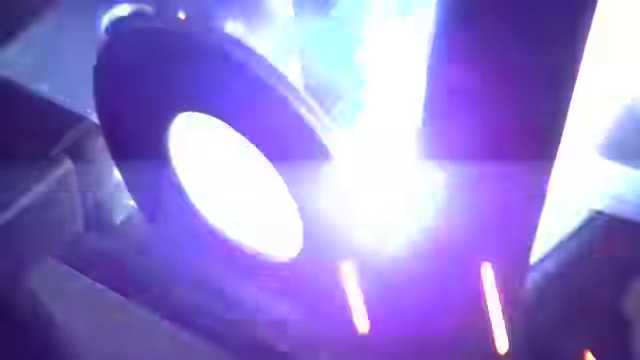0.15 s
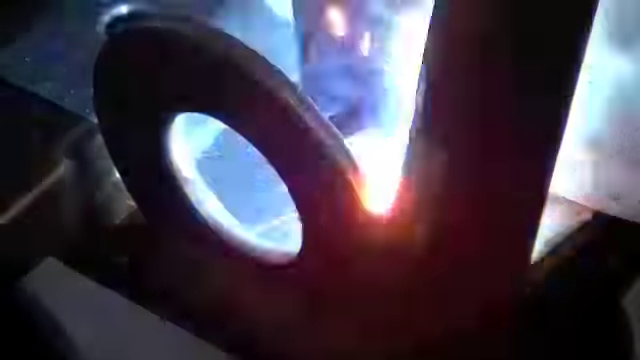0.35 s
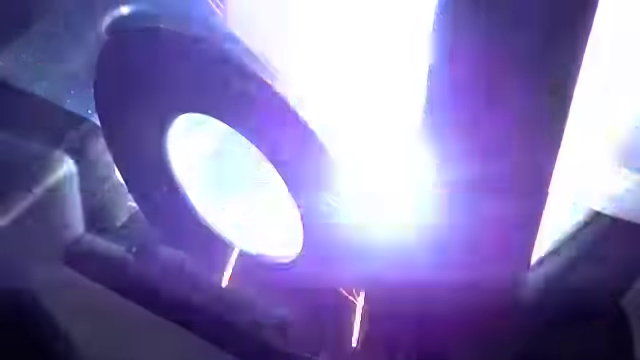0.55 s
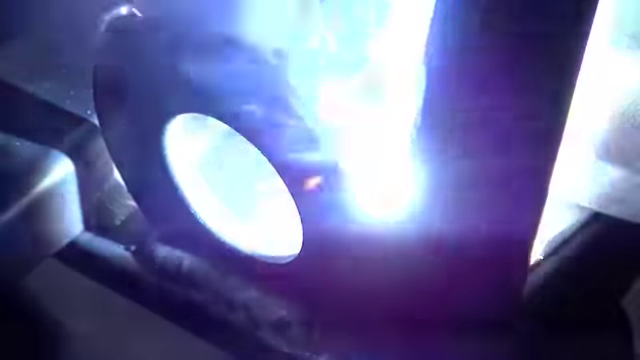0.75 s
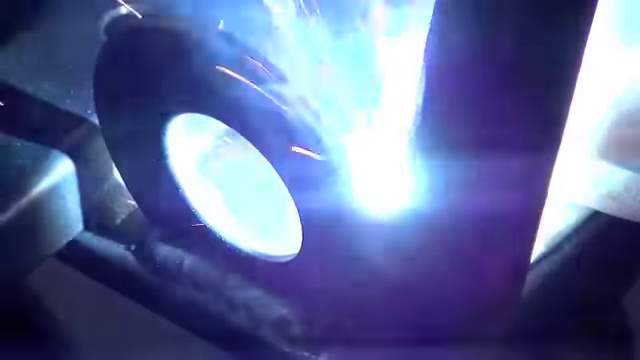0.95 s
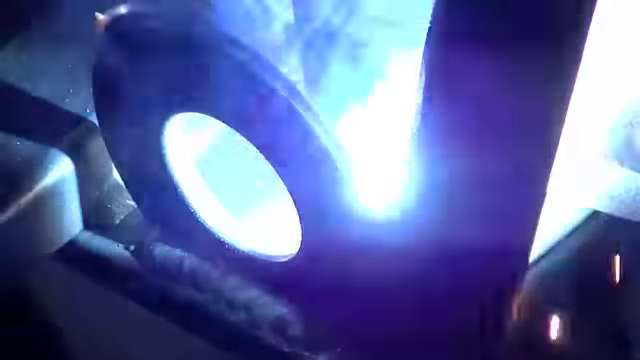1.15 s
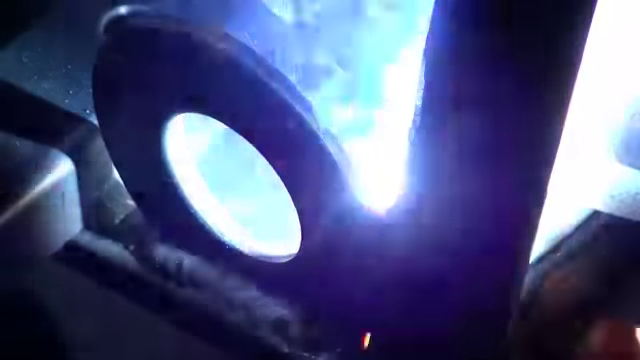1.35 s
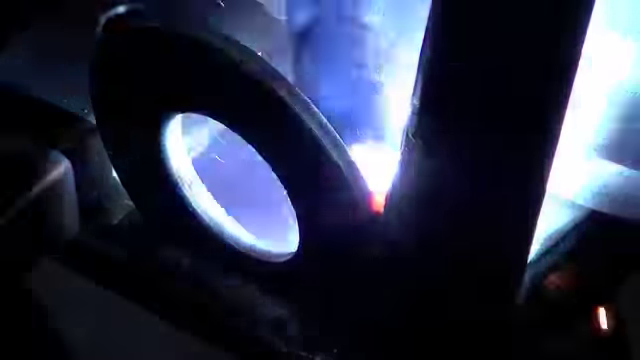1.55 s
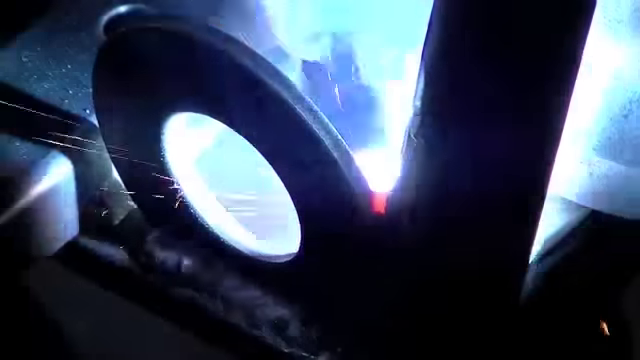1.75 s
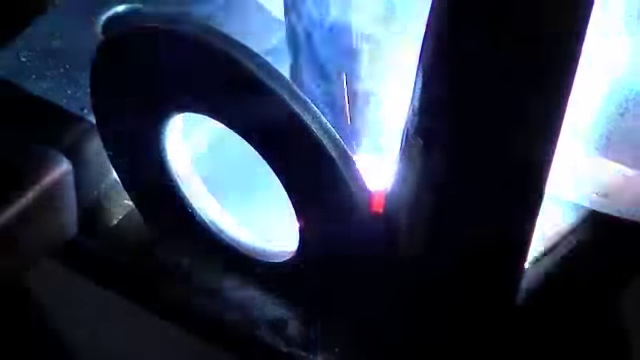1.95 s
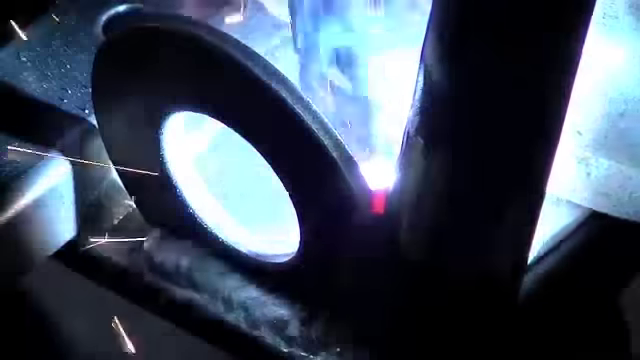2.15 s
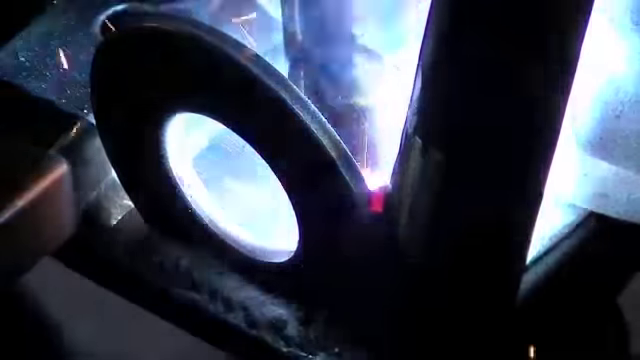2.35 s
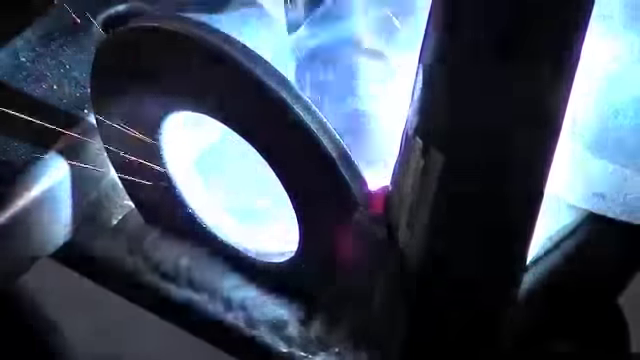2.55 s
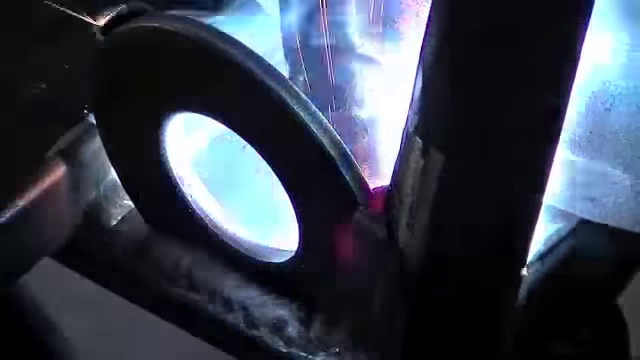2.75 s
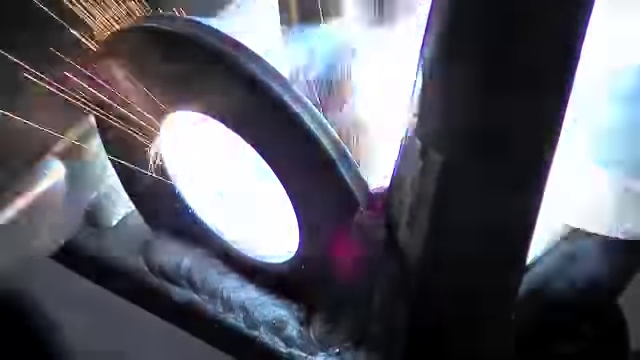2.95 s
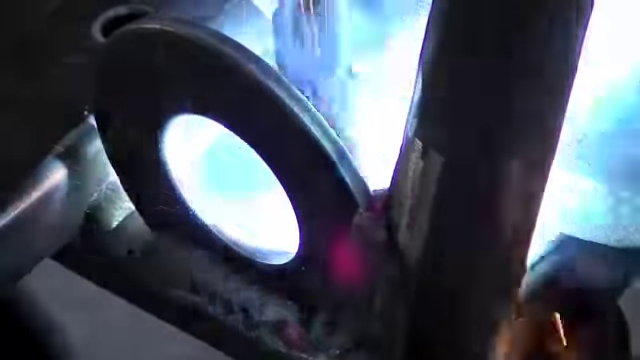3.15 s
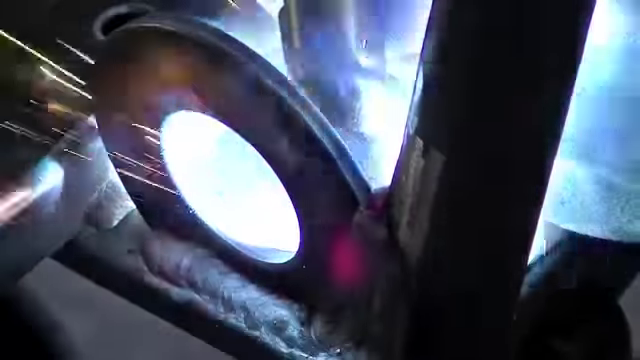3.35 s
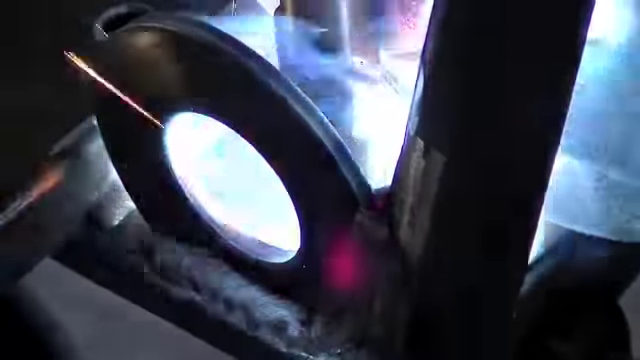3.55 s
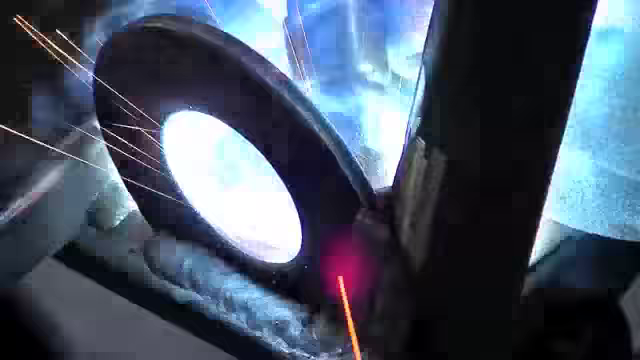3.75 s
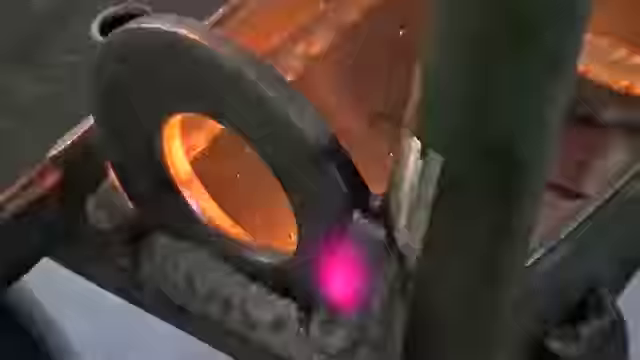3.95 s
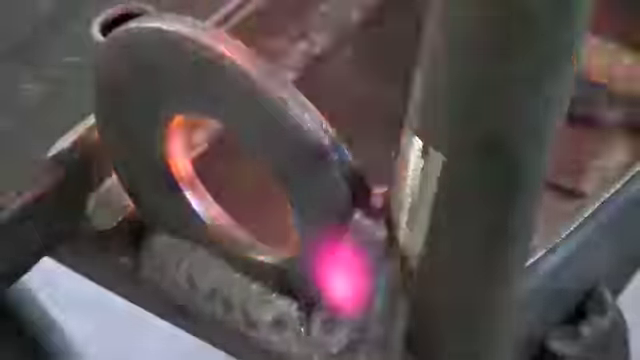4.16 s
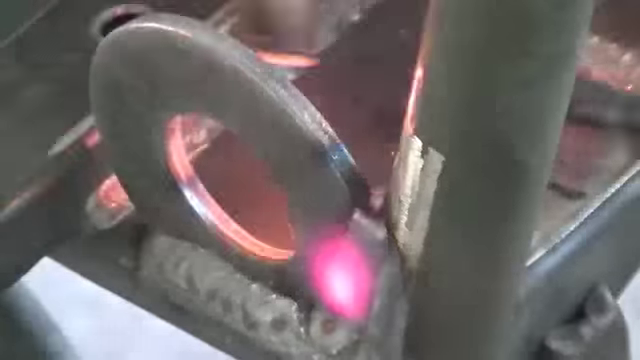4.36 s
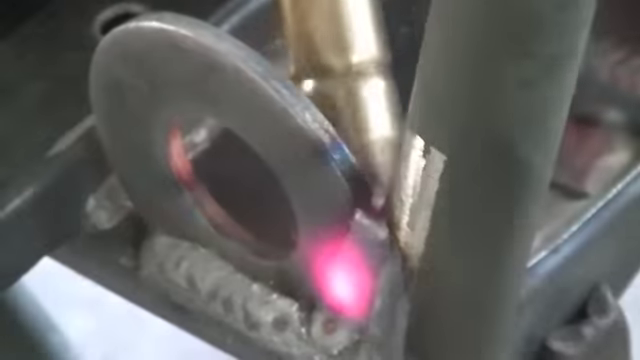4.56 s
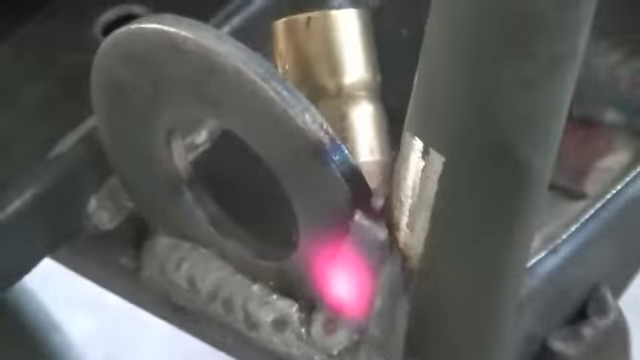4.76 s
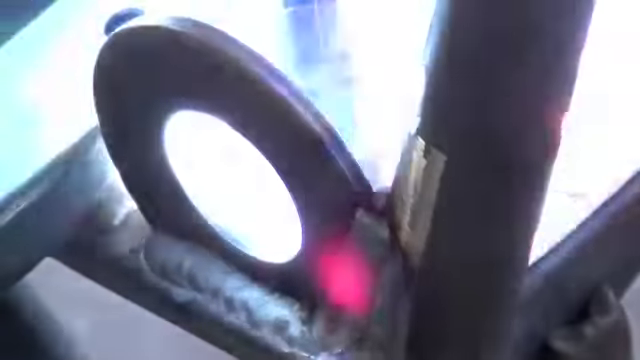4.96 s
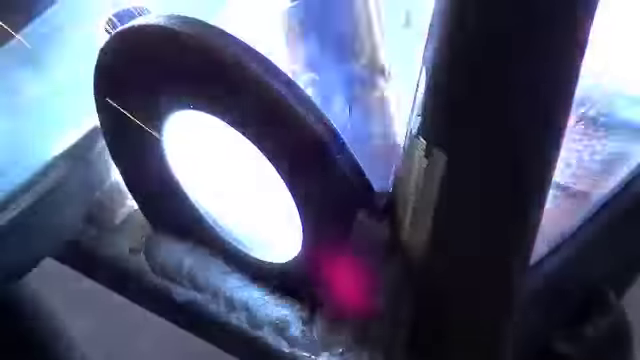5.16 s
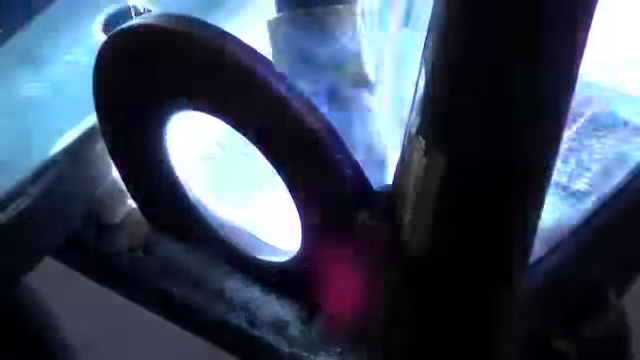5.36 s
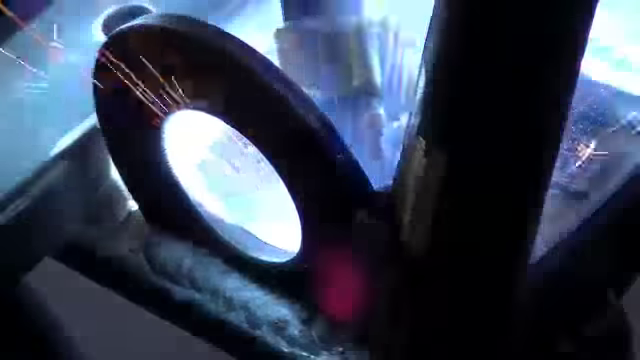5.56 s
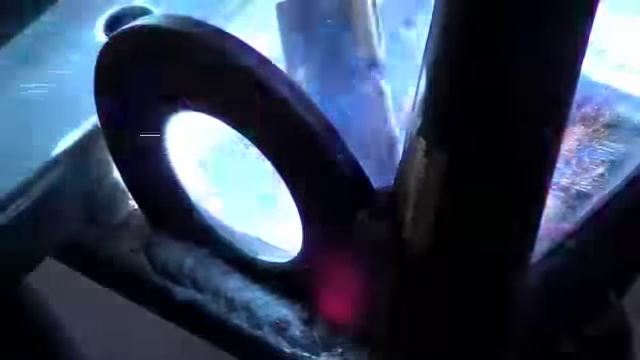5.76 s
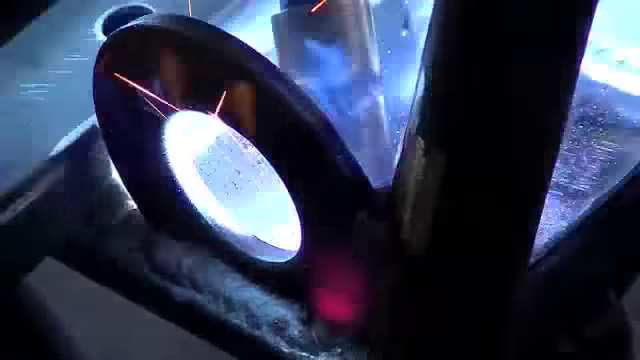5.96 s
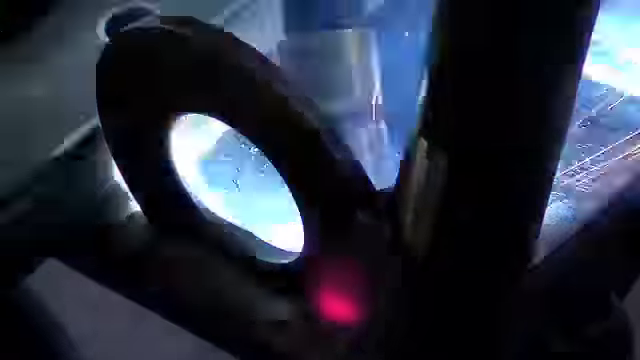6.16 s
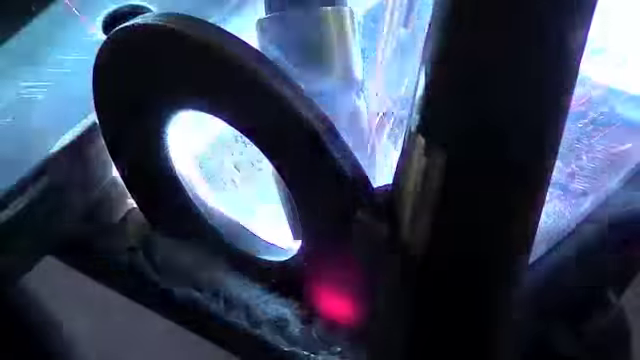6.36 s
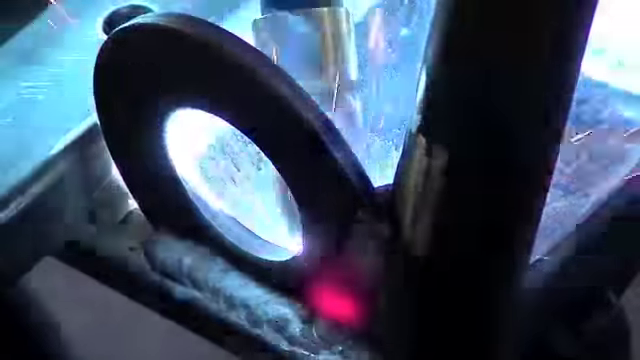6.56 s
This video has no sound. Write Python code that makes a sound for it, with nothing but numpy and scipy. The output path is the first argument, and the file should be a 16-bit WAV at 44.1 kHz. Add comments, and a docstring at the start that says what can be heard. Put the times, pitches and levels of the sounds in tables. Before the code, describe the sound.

A harsh, rapidly snapping welding arc fades out, returns as a softer sizzling hiss, stops to reveal workshop machinery and a tiny squeak, then reignites.

```python
"""Wire-feed welding in a workshop

An arc is heard from three torch positions in turn: short circuits snap, droplets crackle and the arc hisses.
These impulses and noises excite the resonances of the steel parts. The sound fades out and in once. Later,
while the arc is out, the filtered noise of the shop machinery comes up with puffs of air and a squeak.
A few steady motor tones whine beneath the later positions."""
import sys
import numpy as np
from scipy import signal
from scipy.fft import rfft, irfft
from scipy.io import wavfile
from scipy.ndimage import uniform_filter1d

SR = 44100
rng = np.random.default_rng(int(sys.argv[2]) if len(sys.argv) > 2 else 0)


def unload_audio(sound):
    """Save the sound as a 16-bit wav file, at the path given as the first command line argument."""
    columns = np.transpose(np.atleast_2d(sound))
    # keep every value between -1 and 1, then stretch to whole-number steps
    steps = np.round(np.clip(columns, -1, 1) * 32767)
    wavfile.write(sys.argv[1], SR, steps.astype(np.int16))


N = 291060

# Lone short circuits of the first position. Each row: time in seconds, level over the arc strength in dB,
# length in seconds of the stall before it.
SNAPS = [(0.1527, 23.5, 0.004), (0.218, 14, 0.061), (0.228, 23, 0.0098), (0.2348, 17, 0.021),
         (0.248, 22.5, 0.013), (0.2862, 24, 0.047), (0.361, 23, 0), (0.3762, 17, 0), (0.3847, 21, 0),
         (0.4224, 23.5, 0.023), (0.4505, 25, 0.026), (0.4878, 21, 0), (0.4926, 22, 0.0046),
         (0.5078, 22, 0.0068), (0.5229, 17, 0), (0.5562, 18, 0), (0.605, 7, 0), (0.6203, 16, 0),
         (0.6251, 22, 0.013), (0.7407, 23, 0), (0.7524, 8, 0.027), (0.7673, 23, 0.021), (1.051, 20, 0),
         (1.07, 22, 0.0027)]
# Later strikes of the arc, in the second and third positions. Each row: time in seconds, click level in dB,
# length in seconds of the stall before it.
RESTRIKES = [(2.9543, -7, 0), (2.9772, -8, .022), (3.0398, -4, .024), (3.0724, -5, .018), (3.0798, -7, 0),
             (3.0994, -8, .008), (3.1241, -4, .024), (3.1426, -8, .008), (3.1536, -4, .008),
             (3.1644, -6, .008), (3.1968, -5, 0), (3.2165, -5, 0), (3.7255, -6, 0), (3.7536, -4, .02),
             (3.7895, -7, .02), (3.8143, -4, .008), (3.8221, -7, .006), (3.836, -8, .012), (4.901, -12, 0),
             (4.9059, -4, 0), (4.9111, -6, 0), (4.9397, -6, 0), (6.0657, -4, .022), (6.0911, -8, 0),
             (6.1108, -6, .016), (6.1316, -5, .006), (6.1527, -4, .01), (6.1878, -4, .01),
             (6.2705, -5, .015), (6.2797, -7, 0), (6.3219, -5, 0)]
# Arc strength, one list per position. Each row: time in seconds, level in dB, gain above 12 kHz in dB.
ARC = [
    [(0, -15.5, -5), (.12, -18, -5), (.5, -19, -7), (.65, -18.5, 1), (1.272, -19.5, 5.5)],
    [(1.272, -30, -1), (1.8, -29.5, -3), (2.2, -32, 0.5), (2.6, -29.5, 0), (2.9, -31.5, 6),
     (3.2, -29.5, 6.5), (3.5, -28.5, 4.5), (3.86, -34.5, 11.5), (3.9, -47, 3)],
    [(4.901, -30.5, 2), (5.3, -30, 1.5), (5.8, -31, -0.5), (6.2, -28.5, -1), (6.6, -29.5, -1)],
]
# Balance of the arc's parts, one row per position: crackle in dB, hiss in dB, bare click in dB,
# smear from 0 to 1, diffuse tail in dB.
ARC_MIX = [(-3.5, -2, -31, 0.54, -7.5), (3, -0.5, -35.5, 0.08, -2.5), (5, 4, -49, 0.25, -6)]
# Shop machinery between 150 and 1000 Hz, a list before and one after the silent moment.
# Each row: time in seconds, level in dB.
SHOP = [
    [(0, -34.5), (1.272, -34)],
    [(1.272, -45.5), (3.86, -49), (3.94, -38.5), (4.905, -37.5), (4.915, -50), (4.938, -33.5), (4.946, -53),
     (5.02, -46), (5.9, -44), (6.6, -45)],
]


def arc(k):
    """Source and filter: the crackle, hiss and loud clicks of position k all excite the same steel."""
    # Droplet trains, one row per position: rate per second, gap jitter from 0 to 1, size scatter in dB.
    trains = [(220, .5, 3), (430, .2, 2.2), (420, .22, 2.2)]
    # The body of the first arc below 3 kHz dips, then swells. Each row: time in seconds, gain in dB.
    body = [(0, -4.5), (.44, -2.5), (.6, -15), (.66, -2.5), (1.272, -1)]
    crackle_db, hiss_db, *_ = ARC_MIX[k]
    steel = place(k)

    crackle = undb(crackle_db) * droplets(*trains[k])
    hiss = undb(hiss_db) * rng.standard_normal(N) * undb(1.7 * walk(60))
    strength = undb(curve(ARC[k], 1) + stalls(k))
    sizzle = through(strength * (crackle + hiss), steel / np.sqrt(np.sum(steel ** 2)))

    clicks = loud_clicks(k)
    # the listed times are those of each click's upward peak, or downward peak in the later positions
    peak = steel.argmax() if k == 0 else steel.argmin()
    out = sizzle + np.roll(through(clicks, steel), -peak)

    treble = signal.sosfiltfilt(signal.butter(2, 12000, "highpass", fs=SR, output="sos"), out)
    treble_gain = undb(np.maximum(curve(ARC[k], 2), -20))
    out = out + (treble_gain - 1) * treble
    if k == 0:
        low = signal.sosfiltfilt(signal.butter(2, 3000, fs=SR, output="sos"), out)
        return out + (undb(curve(body, 1)) - 1) * low
    # a restrike also pops straight at the microphone, down to the bass
    pop_db = -3
    return out - undb(pop_db) * clicks


def droplets(rate, jitter, scatter_db):
    """A nearly periodic impulse train: every gap and size differs a little, and the pace wanders."""
    chance = rng.standard_normal((N // 40, 2))
    pace = 1 + .04 * walk(4)[::40][:len(chance)]
    gaps = SR / rate * pace * np.exp(jitter * chance[:, 0])
    at = np.cumsum(gaps).astype(int)
    out = np.zeros(N)
    out[at[at < N]] = undb(scatter_db * chance[at < N, 1])
    return unit(out)


def loud_clicks(k):
    """Short circuits and restrikes as impulses: snaps follow the arc strength, restrikes have their own size."""
    # Even runs of short circuits. Each row: start in seconds, end in seconds, rate per second.
    snap_runs = [(0, .123, 107), (.633, .73, 110), (.77, 1.046, 130), (1.085, 1.255, 114)]
    # Spells of unsteady arc with smaller random restrikes. Each row: start and end in seconds, rate per second.
    unsteady = [(2.98, 3.015, 82), (3.17, 3.3, 67), (3.53, 3.865, 24), (4.96, 5.0, 65), (5.95, 6.04, 40),
                (6.19, 6.33, 40)]
    snap_db, wait_db, snap_scatter_db = 19, 2.5, 1.3  # wait_db is for each doubling of the wait
    sputter_db, sputter_scatter_db = -9.5, 2
    out = np.zeros(N)
    if k == 0:
        at, wait, size = runs(snap_runs, jitter=.2)
        # a longer wait grows a bigger droplet and a louder snap
        out[at] = undb(snap_db + wait_db * np.log2(wait) + snap_scatter_db * size)
        for s, db, _ in SNAPS:
            out[int(s * SR)] = undb(db)
        return out * undb(curve(ARC[0], 1))
    at, _, size = runs(unsteady, jitter=.5)
    out[at] = undb(sputter_db + sputter_scatter_db * size)
    for s, db, _ in RESTRIKES:
        out[int(s * SR)] = undb(db)
    # keep only the clicks of this position
    t = np.arange(N) / SR
    return out * (t > ARC[k - 1][-1][0]) * (t <= ARC[k][-1][0])


def runs(spans, jitter):
    """A renewal process in each span: click samples, each wait over the mean wait, and a random size."""
    rows = []
    for start, end, rate in spans:
        chance = rng.standard_normal((64, 2))
        wait = np.exp(jitter * chance[:, 0] - jitter ** 2 / 2)  # mean 1
        s = start + np.cumsum(wait) / rate
        rows.append(np.c_[s * SR, wait, chance[:, 1]][s < end])
    at, wait, size = np.vstack(rows).T
    return at.astype(int), wait, size


def stalls(k):
    """Amplitude modulation in dB: the arc drops for a moment before some snaps and restrikes."""
    # Depth of a stall in dB, one value per position.
    depth_db = [-3, -9, -7.5]
    events = RESTRIKES if k else SNAPS
    return depth_db[k] * sum(bump(s - length / 2, length) for s, _, length in events if length > 0)


def place(k):
    """Impulse response of position k: ringing steel, paths around the parts and a short diffuse tail."""
    # Broad colour of the arc, one list per position. Each row: frequency in Hz, spectral density in dB.
    colours = [
        [(500, -36), (1000, -10), (3100, -22.5), (5000, -7.5), (7750, -16.5), (10000, -8), (12200, -13.5),
         (16000, -26.5)],
        [(500, -27.5), (2000, -20.5), (4000, -14.5), (6500, -7), (9300, -15.5), (14000, -17.5), (16000, -17)],
        [(500, -29), (2000, -16), (4100, -12), (7400, -6), (9000, -10), (12400, -10), (16000, -9.5)],
    ]
    # Resonances of the steel parts, one list per position. Each row: frequency in Hz, width in Hz, level in dB.
    rings = [
        [(1300, 170, -7.5), (1760, 480, -4.5), (5790, 370, -2.5), (6120, 270, -1.5), (6770, 1000, -6.5),
         (9180, 1500, -7), (10600, 650, -4), (11030, 380, -7)],
        [(3580, 160, -11), (4920, 600, -13), (6110, 300, -1.5), (6600, 300, -13), (8000, 300, -10.5),
         (7920, 1100, -18.5), (9940, 570, -15.5), (11250, 660, -13.5), (13450, 600, -10.5), (15500, 850, -12)],
        [(3560, 170, -5), (5100, 980, -9.5), (6040, 520, -4.5), (7130, 190, -2.5), (8000, 500, -3.5),
         (10060, 810, -4.5), (11040, 860, -3.5), (14630, 1900, -0.5)],
    ]
    # Differences in path length, as delays in milliseconds.
    delays_ms = [.23, .42]
    tail_t60_s = 0.069
    *_, click_db, smear, tail_db = ARC_MIX[k]
    steel = response(colours[k], rings[k])
    steel /= np.abs(steel).max()
    steel[0] += undb(click_db)  # the bare click carries the bass that the steel does not
    for ms in delays_ms:
        # an all-pass filter smears the click in time and keeps its colour
        a = np.zeros(int(ms * SR / 1000) + 1)
        a[0], a[-1] = 1, -smear
        steel = signal.lfilter(a[::-1], a, steel)
    t = np.arange(len(steel)) / SR
    decay = undb(-60 * t / tail_t60_s)
    tail = rng.standard_normal(len(t)) * decay * np.minimum(t / 0.002, 1)
    paths = undb(tail_db) * tail / np.sqrt(np.sum(tail ** 2))
    paths[0] = 1  # direct sound
    h = signal.fftconvolve(steel, paths)
    return h / h[np.abs(h).argmax()]


def hisses():
    """Turbulence as band-limited noise bursts: the arc flares or strikes, and air puffs."""
    # Each row: centre in seconds, length in seconds, level in dB, lowest and highest frequency in Hz.
    puffs = [(0.223, 0.028, -12, 8000, 11400), (.355, 0.0081, -14, 8240, 12000),
             (0.484, 0.011, -13, 8400, 11500), (0.606, 0.035, -10, 8600, 12100),
             (4.178, 0.057, -35, 10900, 15900), (4.39, 0.031, -37.5, 8000, 10500),
             (4.748, 0.052, -34, 11000, 15800), (4.904, 0.0092, -21.5, 1300, 7560),
             (4.9436, 0.00085, -17, 300, 15000)]
    out = np.zeros(N)
    for s, length, db, lo_hz, hi_hz in puffs:
        noise = unit(band(rng.standard_normal(N), lo_hz, hi_hz))
        out += undb(db) * bump(s, length) * noise
    return out


def squeak():
    """Metal resonance: a short burst of noise filtered by a few narrow modes."""
    # Modes of the squeaking metal. Each row: frequency in Hz, width in Hz, level in dB.
    modes = [(1420, 49, 3), (1760, 87, -7), (2100, 100, -3.5), (1295, 60, -8)]
    centre_s, length_s, level_db = 4.386, 0.03, -21.5
    tone = through(rng.standard_normal(N), response([(100, -52), (9000, -41)], modes))
    return undb(level_db) * bump(centre_s, length_s) * unit(tone)


def shop():
    """Fans and motors by subtractive synthesis: noise through their resonances, wavering a little."""
    # Colour before and after the silent moment. Each row: frequency in Hz, spectral density in dB.
    colours = [
        [(12, -56), (20, -18), (107, -15.5), (214, -0.5), (264, -7.5), (516, -0.5), (784, -2), (1700, -2.5),
         (3000, -2), (3900, -4.5), (6600, -120)],
        [(12, -92), (20, -62), (74, -33), (112, -47), (140, -23.5), (298, -25.5), (491, -16), (788, -3.5),
         (958, -14.5), (1450, -9.5), (2540, -11), (3080, -7), (15500, -27)],
    ]
    # Resonances before and after it. Each row: frequency in Hz, width in Hz, level in dB.
    rings = [
        [(212, 16, 0)],
        [(704, 110, -5.5), (1258, 40, -2.5), (1810, 160, -3.5), (2930, 210, -4), (3500, 38, -31),
         (4130, 90, -14)],
    ]
    out = 0
    for levels, colour, modes in zip(SHOP, colours, rings):
        hum = through(rng.standard_normal(N), response(colour, modes))
        hum /= np.std(band(hum, 150, 1000))
        out = out + hum * undb(curve(levels, 1) + 0.18 * walk(13))
    return out


def whine():
    """Additive synthesis of motor tones that share a slight pitch drift and waver singly in level."""
    # Each row: frequency in Hz, level over the shop machinery in dB.
    tones = [(300, -24.5), (420, -21), (698, -14), (778, -4.5), (1475, -9), (2216, -6), (2768, -11),
             (2950, -14), (3137, -4), (3187, -10.5), (3320, -4), (3505, -14.5), (3555, -8)]
    waver_db, pitch_spread = 2.2, 0.0008  # the spread is a fraction of the frequency
    warped_t = np.arange(N) / SR + pitch_spread * np.cumsum(walk(6)) / SR
    out = np.zeros(N)
    for hz, db in tones:
        level = undb(db + waver_db * walk(10))
        out += np.sqrt(2) * level * np.sin(2 * np.pi * hz * warped_t)
    return out * undb(curve(SHOP[1], 1))


def fade():
    """Amplitude envelope: a nearly linear fade out to one silent moment and in again."""
    silent_s, fade_out_s, fade_in_s, power = 1.272, 0.13, 0.1, 1.02
    t = np.arange(N) / SR - silent_s
    ramp = np.where(t < 0, -t / fade_out_s, t / fade_in_s)
    return np.minimum(ramp, 1) ** power


def response(spectrum, rings, size=8192):
    """Minimum-phase impulse response, by folded cepstrum, of a broad colour with resonances standing on it."""
    hz = np.arange(size // 2 + 1) * SR / size + 1
    points = np.array(spectrum, float)
    power = undb(2 * np.interp(np.log(hz), np.log(points[:, 0]), points[:, 1]))
    for f, width, db in rings:
        power += undb(2 * db) / (1 + (2 * (hz - f) / width) ** 2) ** 2
    cepstrum = irfft(np.log(power) / 2)
    # fold the anticausal half onto the causal half
    cepstrum[1:size // 2] *= 2
    cepstrum[size // 2 + 1:] = 0
    return irfft(np.exp(rfft(cepstrum)))[:size // 2]


def through(x, h):
    """Linear filtering: convolution of a signal with an impulse response."""
    return signal.oaconvolve(x, h)[:N]


def band(x, lo_hz, hi_hz):
    """Band-pass filtering with a maximally flat passband."""
    return signal.sosfilt(signal.butter(3, [lo_hz, hi_hz], "bandpass", fs=SR, output="sos"), x)


def undb(db):
    """The decibel as an amplitude ratio: 20 dB for each factor of ten."""
    return 10 ** (np.asarray(db, float) / 20)


def unit(x):
    """Normalization to an RMS of 1."""
    return x / np.sqrt(np.mean(x ** 2))


def curve(table, column):
    """Linear interpolation of a table column over time, with -120 outside the table's span."""
    rows = np.array(table, float)
    return np.interp(np.arange(N) / SR, rows[:, 0], rows[:, column], left=-120, right=-120)


def bump(s, length):
    """A soft-edged super-Gaussian window of height 1, centred at s."""
    return np.exp(-(2 * (np.arange(N) / SR - s) / length) ** 4)


def walk(rate):
    """Low-pass random modulation: levels drawn at a rate per second, smoothed twice, with an RMS of 1."""
    k = int(SR / rate)
    steps = np.repeat(rng.standard_normal(N // k + 1), k)
    smooth = uniform_filter1d(uniform_filter1d(steps, k), k)
    return unit(smooth[:N])


def scene():
    """Superposition of all sources, with a faint low-range difference between the two channels."""
    sources = arc(0) + arc(1) + arc(2) + hisses() + squeak() + shop() + whine()
    mid = fade() * sources
    side_db, side_top_hz = -34, 810
    flutter = unit(band(rng.standard_normal(N), 4.6, 37))
    side = undb(side_db) * band(mid * flutter, 20, side_top_hz)
    return np.array([mid + side, mid - side])


def record(dry):
    """Dynamic compression: a quick gain control ducks loud snaps, peaks are rounded and the top is cut."""
    threshold_db, ratio, release_s, top_hz = -10.5, 1.18, 0.015, 15850
    # peak follower with instant attack and exponential release
    fall_db = 20 * np.log10(np.e) * np.arange(N) / SR / release_s
    level_db = 20 * np.log10(np.abs(dry).max(axis=0) + 1e-9)
    peak_db = np.maximum.accumulate(level_db + fall_db) - fall_db
    cut_db = np.maximum(peak_db - threshold_db, 0) * (1 - 1 / ratio)
    held = dry * undb(-uniform_filter1d(cut_db, size=31))
    rounded = np.tanh(1.058 * held) / 1.113
    return signal.sosfilt(signal.ellip(10, .2, 70, top_hz, fs=SR, output="sos"), rounded)


dry = scene()
out = record(dry)
unload_audio(out)
```